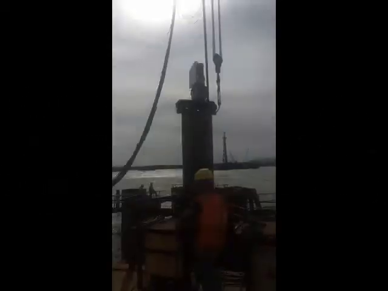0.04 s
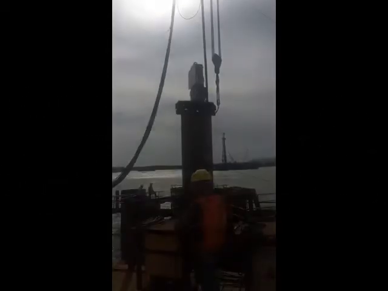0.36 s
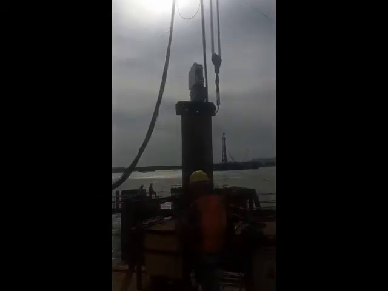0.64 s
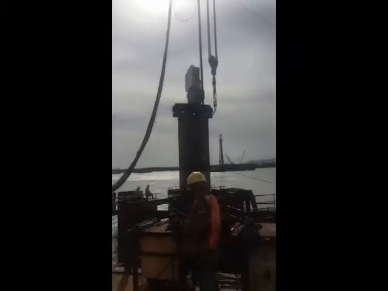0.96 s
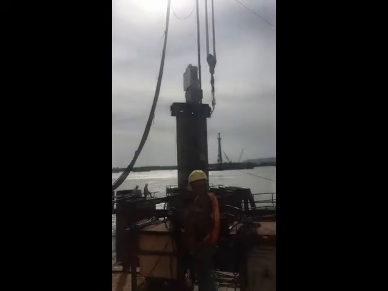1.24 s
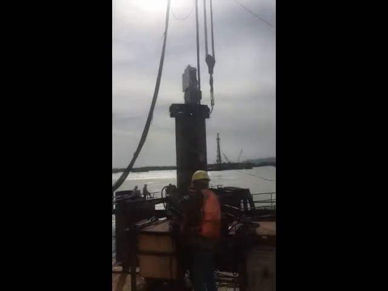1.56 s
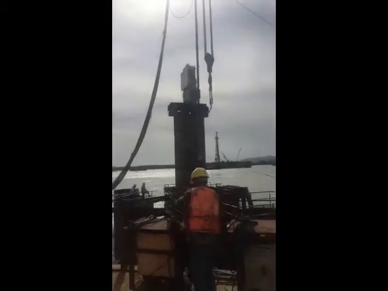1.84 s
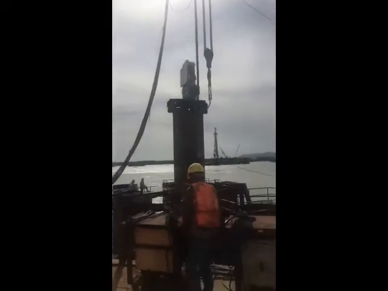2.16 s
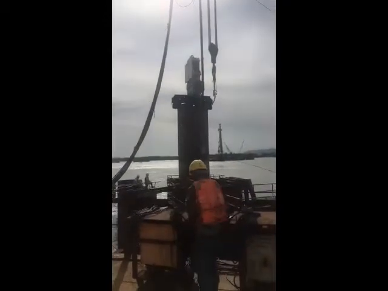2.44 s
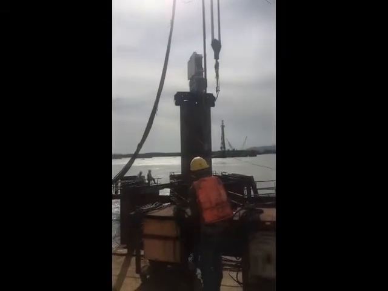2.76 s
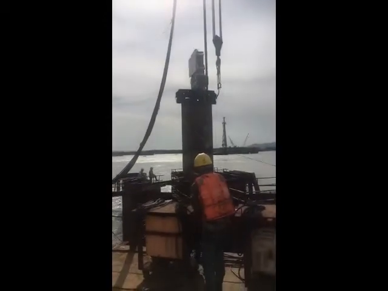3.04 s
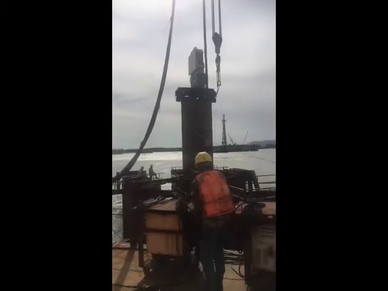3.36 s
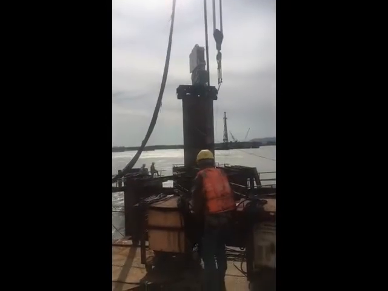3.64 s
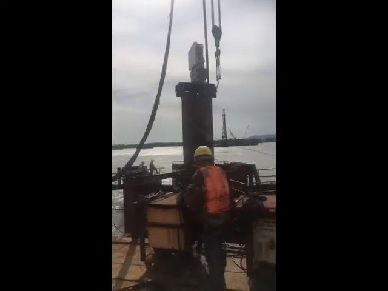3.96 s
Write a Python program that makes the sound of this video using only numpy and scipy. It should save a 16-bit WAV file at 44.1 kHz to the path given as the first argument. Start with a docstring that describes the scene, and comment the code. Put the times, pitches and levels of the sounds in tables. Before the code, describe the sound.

Heavy diesel-driven hydraulic machinery runs with a loud, steady roar, pump whine and metal rattling.

```python
"""Two diesel engines drive hydraulic gear on an open work deck beside the water.
The sound cuts in loud at 0.2 s and settles within a second. The big engine holds its speed and repeats
a dense clatter every cycle; the smaller one hums and hunts a little. Pumps whine, valves whistle and
loose fittings rattle over the rush of fans and exhaust. Wind nudges the microphone at 1.2 s; near 2.2 s
the deck thumps twice under a stronger gust, and a last light gust follows at 2.5 s."""
import sys
import numpy as np
from scipy import signal
from scipy.fft import rfft, irfft
from scipy.io import wavfile
from scipy.ndimage import map_coordinates

SR = 44100
rng = np.random.default_rng(int(sys.argv[2]) if len(sys.argv) > 2 else 0)


def wav_record(signal):
    """Record a signal, one row per channel, as 16-bit PCM in the file named by sys.argv[1]."""
    frames = np.transpose(np.atleast_2d(signal))
    bounded = np.clip(frames, -1, 1)
    # unit amplitude maps onto the largest positive 16-bit level
    quanta = np.round(bounded * 32767).astype(np.int16)
    wavfile.write(sys.argv[1], SR, quanta)


N = 176400
T = np.arange(N) / SR

# The big engine's strongest tones. Each entry: multiple of the cycle rate; below, its level in dB.
BIG_ORDERS = [3, 7, 9, 10, 36, 45, 57, 72, 80, 82, 87, 89, 96, 101, 104, 116]
BIG_ORDER_DB = [-32, -27, -29, -32, -45, -39, -37, -35, -37, -34, -33, -38, -50, -37, -38.5, -39]
# The colour of its clatter. Each row: frequency in Hz, relative level in dB.
CLATTER_EQ = [(150, -14), (250, -5.5), (400, -7.5), (550, -2.5), (900, -6.5), (1300, 0.5), (1440, 1),
              (1550, -1.5), (1640, -5.5), (1950, -10.5), (2900, -11.5), (3900, -14), (4330, -19.5),
              (4900, -26), (9000, -44)]
# The small engine hunting. Each row: time in seconds, shaft speed in Hz.
SHAFT_SPEED = [(0, 34.65), (.6, 34.66), (1.2, 34.51), (1.9, 34.52), (2.9, 34.7), (3.4, 34.56), (4, 34.66)]
# The tones of its hum. Each entry: multiple of the shaft speed; below, its level in dB.
SMALL_ORDERS = [3, 5, 7, 8, 10, 12, 15, 20]
SMALL_ORDER_DB = [-35.5, -26, -30, -29, -28.5, -31.5, -31.5, -31]
# The diesel rumble surges and sags. Each row: centre and half length in seconds, change in dB.
RUMBLE_SURGES = [(.38, .025, -2), (.46, .03, 1.5), (.71, .04, 2), (1.1, .025, -1.5), (1.19, .025, 1.5),
                 (1.72, .025, 2), (1.86, .035, -2), (2.16, .03, 2.5), (2.92, .04, 2), (3.05, .035, -2.5),
                 (3.38, .04, 1.7)]
# The colour of fans and exhaust. Each row: frequency in Hz, relative level in dB.
RUSH_EQ = [(12, -18), (22, -10), (33, -6), (60, 2), (110, -1.5), (205, -.5), (255, 3.5), (320, 0),
           (410, -1.5), (480, -6.5), (690, -5), (780, -7), (920, -3.5), (1150, -10.5), (1520, -9.5),
           (1800, -11), (2250, -13), (2650, -21), (3600, -23.5), (4400, -21.5), (4850, -30.5),
           (5700, -26.5), (7500, -30.5), (9700, -32.5), (10400, -39.5), (11400, -43.5)]
# The pump whines. Each entry: pitch in Hz; below, its level in dB.
PUMP_HZ = [1042, 1542, 1570.5, 1724, 1938, 2084, 4356]
PUMP_DB = [-33.5, -39, -33.7, -39.5, -40, -41, -55]
# The pump casing rings up. Each row: crest of the swell in seconds, level in dB.
CASING_RINGS = [(.26, -31), (.48, -31), (1.05, -32), (1.22, -30), (1.49, -25), (1.74, -26), (2.11, -29),
                (2.28, -28), (2.51, -23), (2.71, -26), (2.89, -28), (3.22, -25)]
# The valve whistles. Each row: pitch in Hz, width in Hz, level in dB.
VALVE_WHISTLES = [(2250, 60, -42), (2445, 25, -47), (2835, 35, -47), (2912, 25, -47), (3400, 45, -50),
                  (3912, 28, -49.5), (4275, 60, -45.5), (4360, 35, -48), (4475, 45, -50), (4720, 35, -56)]
# The colour of the loose fittings. Each row: frequency in Hz, relative level in dB.
RATTLE_EQ = [(850, 1), (1400, 2), (2100, -6), (3100, -1.5), (4500, -9)]
# Dull knocks through the deck. Each row: start in seconds, pitch in Hz, drive in dB.
DECK_THUMPS = [(2.189, 74, -6), (2.239, 105, -11)]
# Wind on the microphone. Each row: centre and half length in seconds, level in dB.
WIND_GUSTS = [(1.19, .04, -25), (2.21, .02, -14), (2.53, .02, -23)]
# Stereo width from deck scatter. Each row: frequency in Hz, level against the rush in dB.
SCATTER_EQ = [(40, -52), (170, -35), (700, -21.5), (1400, -29.5), (2800, -12.5), (5600, -16.5), (9500, -8)]
# The master fader. Each row: time in seconds, gain in dB.
FADER = [(.19, 7.3), (.272, 7.1), (.305, 2.4), (.335, .9), (.39, .7), (.48, 2.3), (.72, 2), (.95, .5),
         (1.6, 0), (2.8, -.5), (4, -.1)]
# The treble shelf as the sound settles. Each row: time in seconds, gain in dB.
TREBLE_RIDE = [(.19, -0.8), (.3, 2.2), (.7, -0.4), (1.2, -0.5), (2.2, -0.5), (4, 0)]

CYCLE_HZ, CYLINDERS, SPEED_WOBBLE = 14.757, 6, .000535  # the big engine
RUSH_DB = -17.5


def big_engine(cycles, firing, clatter_db=-25.5, spread_db=2.5):
    """Valves, injectors and gears repeat one clatter every cycle; a few orders stand out as tones."""
    length = int(SR / CYCLE_HZ)
    count = length // 2 + 1
    comb = from_db(spread_db * rng.standard_normal(count)) * np.exp(2j * np.pi * rng.random(count))
    comb[np.isin(np.arange(count), BIG_ORDERS)] = 0  # leave room for the tones
    one_cycle = irfft(comb, length)
    looped = map_coordinates(one_cycle, [cycles % 1 * length], order=3, mode="grid-wrap")
    clatter = from_db(clatter_db) * rms_one(coloured(looped * firing, CLATTER_EQ))
    return clatter + sum(tone(order * cycles, db) for order, db in zip(BIG_ORDERS, BIG_ORDER_DB))


def firing_pulse(cycles, depth=.11, decay_s=.003, spread_db=2):
    """Each firing gives a sharp swell that dies away; every cylinder has its own strength."""
    firings = cycles * CYLINDERS
    strength = from_db(spread_db * rng.standard_normal(CYLINDERS))
    cylinder = firings.astype(int) % CYLINDERS
    age_s = firings % 1 / (CYCLE_HZ * CYLINDERS)
    return rms_one(1 + depth * strength[cylinder] * np.exp(-age_s / decay_s))


def small_engine(waver_hz=.13, rough_db=3):
    """A rough hum of shaft orders that follows the slowly hunting, slightly uneven speed."""
    shaft = turns_of(in_time(SHAFT_SPEED) + waver_hz * drift(per_s=5))
    return sum(tone(order * shaft, db) * rms_one(from_db(rough_db * drift(per_s=22)))
               for order, db in zip(SMALL_ORDERS, SMALL_ORDER_DB))


def surging(x, band_hz=(100, 450)):
    """The diesel rumble swells and sags while the rest holds steady."""
    rumble = signal.sosfiltfilt(bandpass(*band_hz), x)
    change_db = sum(db * bell(s, half_s) for s, half_s, db in RUMBLE_SURGES)
    return x + rumble * (from_db(change_db) - 1)


def fans_and_exhaust(firing, flicker_db=.7, throb_db=.82):
    """Turbulent air, pulsed by the firings; it throbs as a whole and flickers octave by octave."""
    white = rfft(rng.standard_normal(N))
    hz = np.arange(len(white)) * SR / N
    octave = np.log2(np.maximum(hz / 50, 1)).astype(int)
    air = sum(irfft(white * (octave == k), N) * from_db(flicker_db * drift(per_s=10.5))
              for k in range(9))
    throb = from_db(throb_db * drift(per_s=50))
    return from_db(RUSH_DB) * rms_one(coloured(air * firing * throb, RUSH_EQ))


def pumps():
    """The hydraulic pumps whine steadily while a casing rings up and dies back."""
    whines = sum(tone(hz * T, db) for hz, db in zip(PUMP_HZ, PUMP_DB))
    swells = sum(from_db(db) * bell(s, half_s=.045) for s, db in CASING_RINGS)
    return whines + swells * singing_noise(hz=1548, width_hz=70)


def valves(fade_above_hz=4200, fade_db_per_s=1.3):
    """Oil forced through valves gives thin, fluttering whistles; the highest ones slowly fade."""
    fade_db = fade_db_per_s * (T.mean() - T)
    return sum(from_db(db + fade_db * (hz > fade_above_hz)) * singing_noise(hz, width_hz)
               for hz, width_hz, db in VALVE_WHISTLES)


def loose_fittings(pings_per_s=70, low_hz=850, high_hz=4500, decay_s=.018, level_db=-32.5):
    """Loose steel pings at random moments, each time at a pitch and strength of its own."""
    pings, age_s = np.zeros(N + SR), T[:SR // 10]
    for when, pitch, strength in rng.random((int(pings_per_s * N / SR), 3)):
        hz = low_hz * (high_hz / low_hz) ** pitch
        ring = np.exp(-age_s / decay_s) * np.sin(2 * np.pi * hz * age_s)
        start = int(when * N)
        pings[start:start + len(ring)] += (1 + strength) * ring
    return from_db(level_db) * rms_one(coloured(pings[:N], RATTLE_EQ))


def deck_thumps(attack_s=.0025, decay_s=.0066):
    """Each knock through the deck is one low, heavily damped ring."""
    out = np.zeros(N)
    for s, hz, db in DECK_THUMPS:
        age_s = np.maximum(T - s, 0)
        envelope = (1 - np.exp(-age_s / attack_s)) * np.exp(-age_s / decay_s)
        out += from_db(db) * envelope * np.sin(2 * np.pi * hz * age_s)
    return out


def wind(band_hz=(20, 84.5)):
    """Gusts hit the microphone as short, low bumps."""
    rumble = rms_one(signal.sosfilt(bandpass(*band_hz), rng.standard_normal(N)))
    return rumble * sum(from_db(db) * bell(s, half_s) for s, half_s, db in WIND_GUSTS)


def deck_scatter():
    """Scatter from the deck: a faint, airy wash that widens the treble."""
    wash = from_db(RUSH_DB) * rms_one(coloured(rng.standard_normal(N), RUSH_EQ))
    return coloured(wash, SCATTER_EQ)


def tone(turns, db, wander_hz=.9, flicker_db=2.5):
    """One partial, flickering and wandering slightly in the open air."""
    phase = turns + turns_of(wander_hz * drift(per_s=4.27)) + rng.random()
    flicker = from_db(flicker_db * drift(per_s=8.4))
    return from_db(db) * rms_one(flicker * np.sin(2 * np.pi * phase))


def singing_noise(hz, width_hz):
    """Turbulence through a narrow resonance, at unit power."""
    resonance = bandpass(hz - width_hz / 2, hz + width_hz / 2)
    return rms_one(signal.sosfilt(resonance, rng.standard_normal(N)))


def drift(per_s):
    """A smooth random modulator with a spread of 1."""
    hop, warm_up = 40, 2000
    pole = np.exp(-2 * np.pi * per_s * hop / SR)
    noise = rng.standard_normal(N // hop + warm_up + 2)
    slow = signal.lfilter([1], [1, -2 * pole, pole * pole], noise)[warm_up:]
    return np.interp(np.arange(N) / hop, np.arange(len(slow)), rms_one(slow))


def coloured(x, eq):
    """Equalise by rows of frequency in Hz and gain in dB."""
    hz, db = np.transpose(eq)
    bin_hz = np.maximum(np.arange(N // 2 + 1) * SR / N, 1)
    gain_db = np.interp(np.log(bin_hz), np.log(hz), db)
    return irfft(rfft(x) * from_db(gain_db), N)


def shelf(x, db, above_hz):
    """A gentle treble lift or cut."""
    treble = signal.sosfilt(signal.butter(1, above_hz, "high", fs=SR, output="sos"), x)
    return x + treble * (from_db(db) - 1)


def bandpass(low_hz, high_hz):
    """A soft-edged band filter."""
    return signal.butter(2, [low_hz, high_hz], "band", fs=SR, output="sos")


def bell(s, half_s):
    """A smooth swell of height 1."""
    return np.exp(-.5 * ((T - s) / half_s) ** 2)


def turns_of(hz):
    """Turns completed at a changing speed."""
    return np.cumsum(hz) / SR


def in_time(rows):
    """An automation curve through rows of seconds and value."""
    return np.interp(T, *np.transpose(rows))


def from_db(db):
    """Decibels to gain."""
    return np.exp(np.log(10) / 20 * np.asarray(db))


def rms_one(x):
    """Scale to unit power."""
    return x / np.sqrt(np.mean(x ** 2) + 1e-20)


def scene():
    """The machines stand near the middle, their treble a touch to the right, with scatter around them."""
    cycles = turns_of(CYCLE_HZ * (1 + SPEED_WOBBLE * drift(per_s=2.14)))
    firing = firing_pulse(cycles)
    diesels = surging(big_engine(cycles, firing) + small_engine() + fans_and_exhaust(firing))
    machines = diesels + pumps() + valves() + loose_fittings()
    sides = np.array([[-1], [1]])  # left, right
    panned = shelf(machines, db=.55 * sides, above_hz=650)
    return panned + deck_scatter() * sides + wind() + deck_thumps()


def record(dry, start_s=.1915, cut_in_s=.002, ceiling=1.2, cutoff_hz=12400):
    """The sound cuts in loud, brightens briefly and settles; peaks are rounded and the top is cut."""
    shaped = shelf(dry, in_time(TREBLE_RIDE), above_hz=1610)
    gate = np.clip((T - start_s) / cut_in_s, 0, 1)
    faded = shaped * from_db(in_time(FADER)) * gate
    rounded = ceiling * np.tanh(faded / ceiling)
    return signal.sosfilt(signal.cheby2(16, 70, cutoff_hz, fs=SR, output="sos"), rounded)


dry = scene()
out = record(dry)
wav_record(out)
```